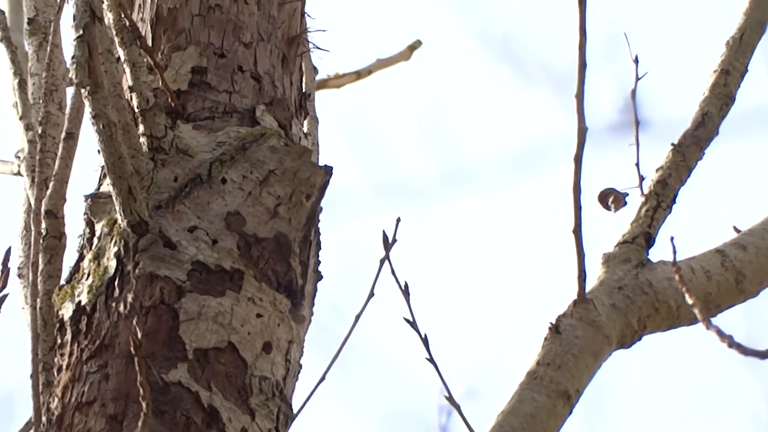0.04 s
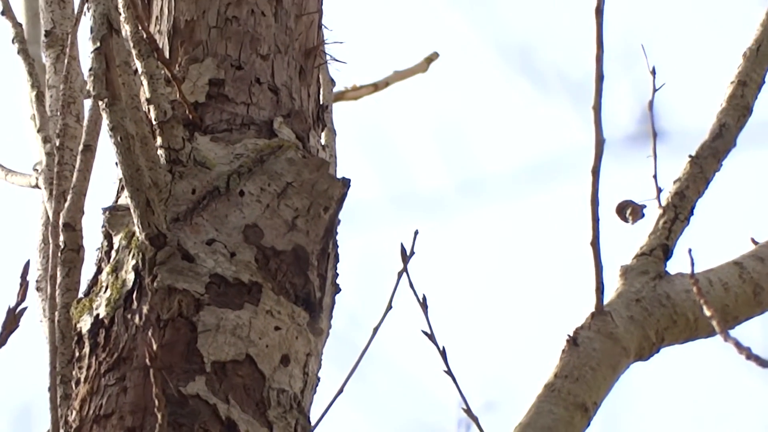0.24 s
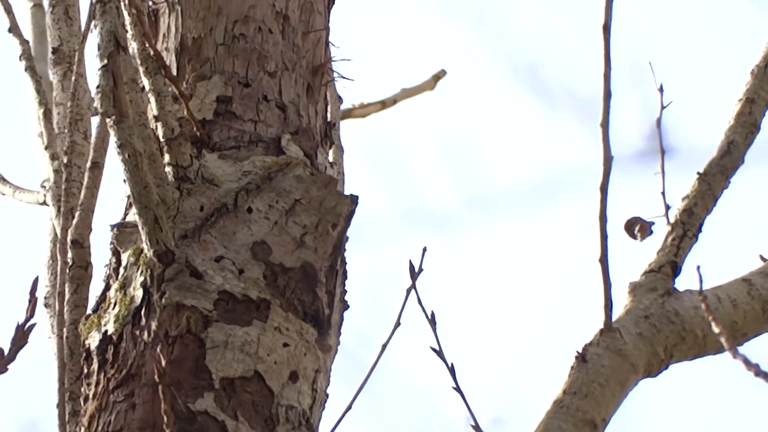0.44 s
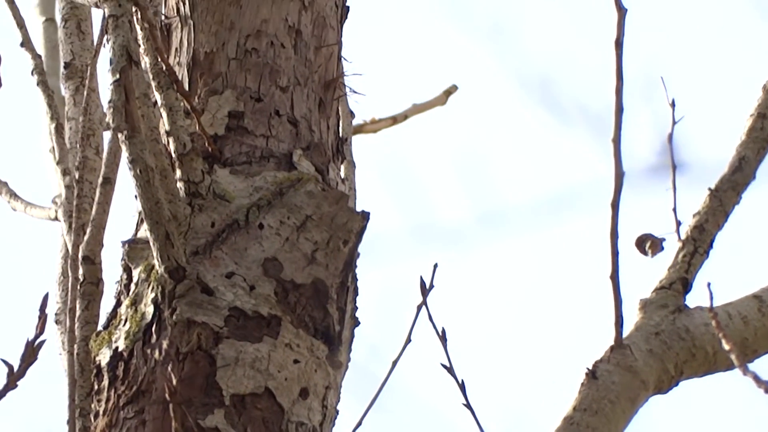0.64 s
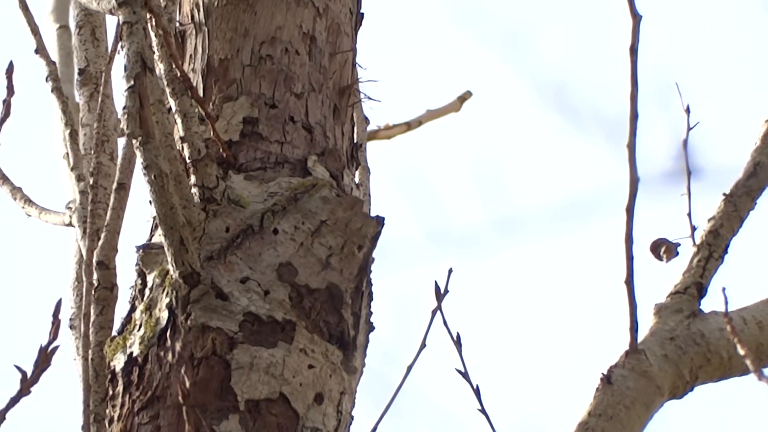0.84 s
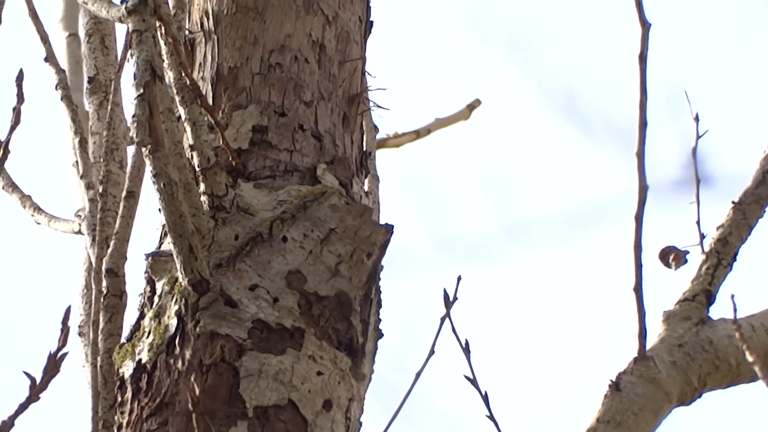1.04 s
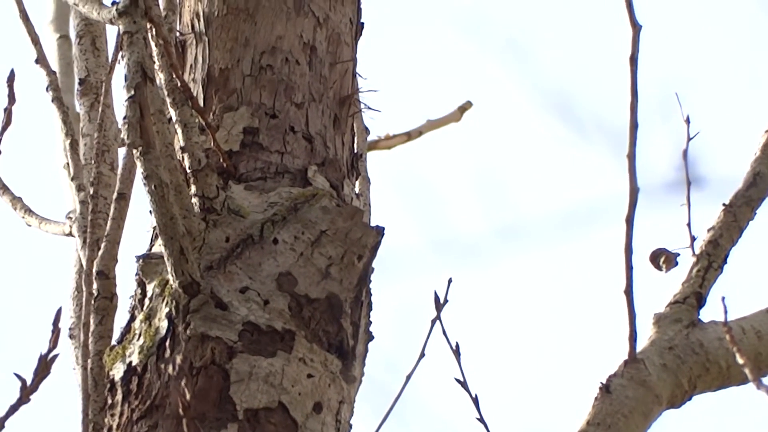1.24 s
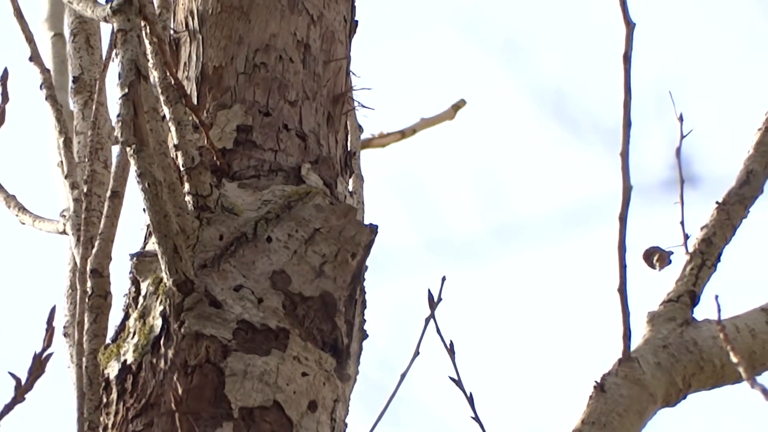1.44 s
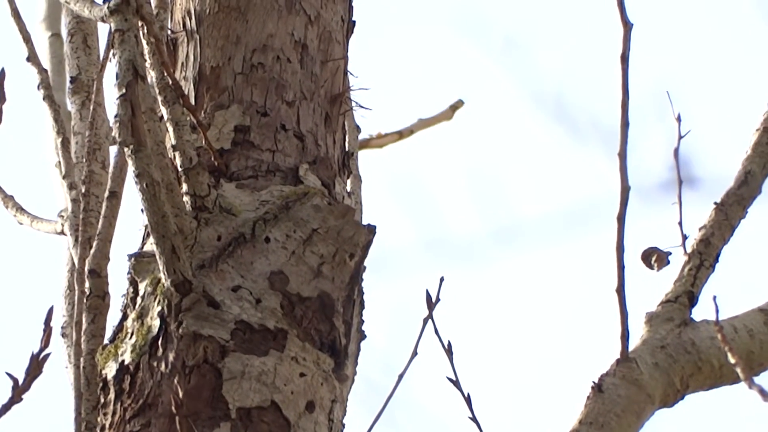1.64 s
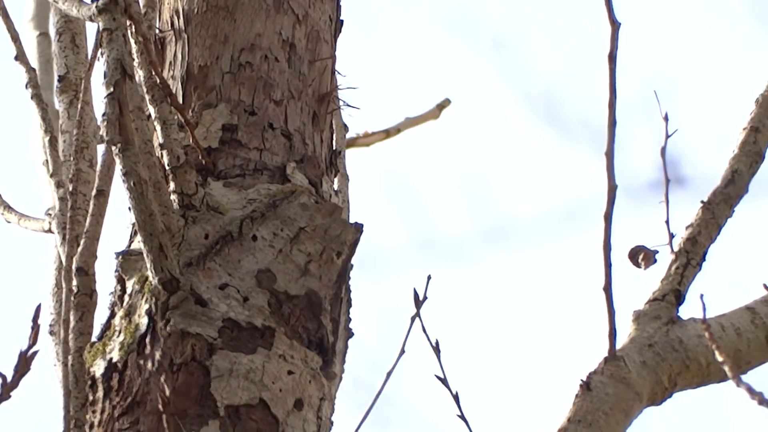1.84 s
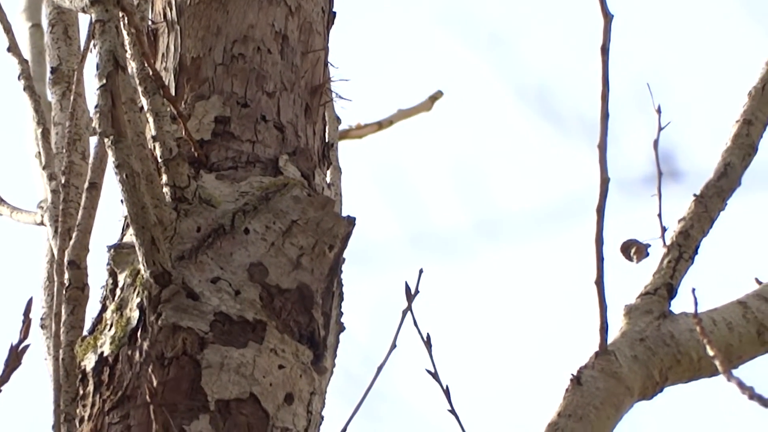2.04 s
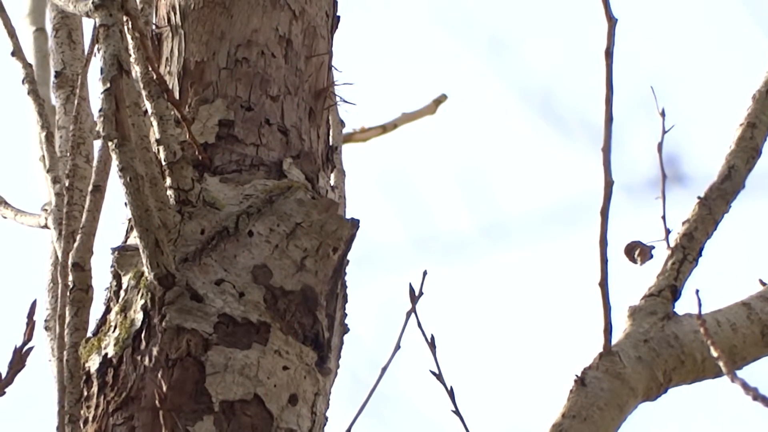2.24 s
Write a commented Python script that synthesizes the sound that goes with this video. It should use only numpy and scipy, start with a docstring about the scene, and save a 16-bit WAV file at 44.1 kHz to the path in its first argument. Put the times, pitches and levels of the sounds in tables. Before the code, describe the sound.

A small bird sings a quick run of thin, high chirps with upward flicks, growing louder past 1 second and echoing lightly among trees. Far off to the left, a woodpecker drums briefly at 0.3 seconds, then from 0.8 to 2. The song stops near 1.9 seconds with a soft lower whistle. A farther bird answers around 2.2 seconds. A faint outdoor hush continues throughout.

```python
"""Over a faint steady outdoor hush, a small bird starts a quick run of thin, high, whistled chirps.
They climb and swell, with sharp upward flicks and soft twitters between; the trees scatter each one.
Far off, probably a woodpecker joins in, each beak blow ringing a trunk's modes.
Near 2 s the song stops, a distant moan swells, a soft lower whistle sounds and the drumming ends.
Last, a farther bird answers."""
import sys
import numpy as np
from scipy import signal
from scipy.fft import rfft, irfft
from scipy.io import wavfile
from scipy.ndimage import uniform_filter1d

SR = 44100
rng = np.random.default_rng(int(sys.argv[2]) if len(sys.argv) > 2 else 0)


def persist_wave(psi):
    """Save psi, clipped to +-1, as 16-bit WAV."""
    counts = np.round(np.clip(psi, -1, 1) * 32767).astype(np.int16)
    wavfile.write(sys.argv[1], SR, np.atleast_2d(counts).T)


N = 101429


def amp(db):
    """dB to gain."""
    return 10 ** (np.asarray(db) / 20)


def unit(x):
    """Scale to rms 1."""
    return x / np.sqrt(np.mean(x ** 2) + 1e-20)


def log_interp(points, hz):
    """Interpolate (f/Hz, value) points on a log-frequency axis."""
    points_hz, values = np.transpose(points)
    return np.interp(np.log(hz + 1), np.log(points_hz + 1), values)


def add(mix, start_s, sound):
    """Mix in at start_s, cropped to fit."""
    at = round(start_s * SR)
    sound = sound[max(-at, 0):]
    part = mix[max(at, 0):][:len(sound)]
    part += sound[:len(part)]


def wander(size, rate_hz):
    """Smooth noise, rms about 1, Gaussian roll-off at rate_hz."""
    span = max(size, 8192)
    hz = np.fft.rfftfreq(span, 1 / SR)
    spectrum = rfft(rng.standard_normal(span)) * np.exp(-(hz / rate_hz) ** 2)
    return unit(irfft(spectrum, span))[:size]


def scatter(x, t60_s, echoes_per_s):
    """Sparse, decaying echoes off trunks and branches; unit-energy response."""
    t = np.arange(SR) / SR
    signs = rng.choice([-1., 1.], SR)
    taps = signs * (rng.random(SR) < echoes_per_s / SR) * amp(-60 * t / t60_s)
    return signal.fftconvolve(x, taps / (np.linalg.norm(taps) + 1e-12))[:N]


def air(spectrum, coherence, patch_db):
    """Steady stereo noise, rms 1, with faint drifting patches; partly common to both sides."""
    hz = np.fft.rfftfreq(1024, 1 / SR)
    re, im, other_re, other_im, patches = rng.standard_normal((N // 256 + 5, len(hz), 5)).T
    patches = uniform_filter1d(patches, size=8, axis=0)  # across frequency
    patches = unit(uniform_filter1d(patches, size=16, axis=1))  # across time
    shared = np.clip(log_interp(coherence, hz), 0, 1)[:, None]
    left = re + 1j * im
    right = shared * left + np.sqrt(1 - shared ** 2) * (other_re + 1j * other_im)
    gain = amp(log_interp(spectrum, hz)[:, None] + patch_db * patches)
    _, noise = signal.istft(np.array([left, right]) * gain, nperseg=1024, noverlap=768)
    return unit(noise[:, :N])


# Hush spectrum: f/Hz, relative density/dB
HUSH_SPECTRUM = [(15, -54.5), (25, -33.5), (132, -23.5), (313, -18), (510, -6.5), (557, -6), (812, -10.5),
                 (948, -7.5), (1080, -11), (1350, -3.5), (1890, -15), (2630, -10.5), (3140, -16),
                 (4680, -18.5), (5000, -16), (6500, -53.5), (11000, -120)]
# Left-right likeness: f/Hz, coherence/0-1
HUSH_COHERENCE = [(60, 0.36), (150, 0.48), (300, 0.59), (550, 0.5), (1000, 0.35), (2000, 0.17),
                  (4200, 0.41)]
# Slow swell: t/s, gain/dB
HUSH_SWELL = [(0, -.5), (.7, 0), (1.3, 2.5), (1.7, 3.5), (2.05, 3), (2.3, -1)]


def hush():
    """Faint outdoor noise, swelling slightly."""
    swell_db = np.interp(np.arange(N) / SR, *np.transpose(HUSH_SWELL))
    return amp(-78.5 + swell_db) * air(HUSH_SPECTRUM, HUSH_COHERENCE, patch_db=1.1)


# Hiss spectrum: f/Hz, relative density/dB
HISS_SPECTRUM = [(2500, -23), (5000, -6), (7000, 5), (9500, -19.5), (12000, -11.5), (15500, -16)]


def hiss():
    """Faint, patchy treble noise, near centre."""
    return amp(-80.5) * air(HISS_SPECTRUM, coherence=[(4000, .99), (10000, .9)], patch_db=3.5)


# Moan contour: t/s, f/Hz, level/dB
MOAN_CONTOUR = [(0, 430, -110), (1.5, 410, -105), (1.622, 430, -85.5), (1.82, 490, -84), (1.92, 540, -73.5),
                (2.051, 550, -84.5), (2.159, 540, -93), (2.28, 540, -79.5)]


def moan(width_hz=45):
    """Distant narrow-band noise; rises and swells late."""
    knots_s, hz, level_db = np.transpose(MOAN_CONTOUR)
    t = np.arange(N) / SR
    phase = 2 * np.pi * np.cumsum(np.interp(t, knots_s, hz)) / SR
    sides = [wander(N, width_hz) * np.cos(phase) + wander(N, width_hz) * np.sin(phase) for _ in range(2)]
    return amp(np.interp(t, knots_s, level_db)) * np.array(sides)


# Trunk modes: f/Hz, relative level/dB, t60/s
TRUNK_MODES = [(1160, -20.5, 0.06), (1379.3, -0.5, 0.063), (1499, -9.5, 0.077), (2080, -14.5, .025),
               (2490, -18, 0.05)]


def blow(rise_s=.0035):
    """One beak blow rings the trunk's modes, each slightly detuned at random."""
    t = np.arange(SR // 8) / SR
    ring = np.zeros(len(t))
    for hz, level_db, t60_s in TRUNK_MODES:
        detuned_hz = hz * (1 + .0025 * rng.standard_normal())
        ring += amp(level_db - 60 * t / t60_s) * np.sin(2 * np.pi * detuned_hz * t)
    return (1 - np.exp(-t / rise_s)) * ring


# Beak blows on wood: t/s, relative level/dB
BEAK_BLOWS = [(.297, -86.5), (0.348, -73), (.398, -73), (.450, -64), (0.502, -68), (0.807, -64.5),
              (0.862, -61.5), (0.909, -64.5), (0.955, -61), (1.004, -59), (1.051, -65), (1.094, -60.5),
              (1.141, -59.5), (1.189, -60.5), (1.234, -63.5), (1.28, -59.5), (1.328, -56.5), (1.374, -60),
              (1.421, -61.5), (1.468, -61), (1.514, -55.5), (1.56, -56), (1.607, -58.5), (1.654, -56.5),
              (1.697, -63.5), (1.746, -57), (1.791, -62), (1.835, -58), (1.882, -57.5), (1.927, -55.5),
              (1.978, -61.5)]


def drumming(left_db=2.5, right_db=-1.5):
    """Two distant rolls, left of centre, blurred by the trees."""
    blows = np.zeros(N)
    for start_s, level_db in BEAK_BLOWS:
        add(blows, start_s, amp(level_db) * blow())
    early = blows + amp(-5.5) * scatter(blows, .15, 1500)
    tails = np.array([scatter(blows, 1.0, 2500), scatter(blows, .35, 3100)])
    return amp([[left_db], [right_db]]) * (early + amp(-3.5) * tails)


def whistle(hz, quaver_hz=75.5):
    """Sine, rms 1, with random pitch quaver."""
    quavering_hz = hz + quaver_hz * wander(len(hz), rate_hz=267)
    return np.sqrt(2) * np.sin(2 * np.pi * np.cumsum(quavering_hz) / SR)


# Soft short notes: t/s, length/s, first f/Hz, last f/Hz, level/dB
TWITTER_NOTES = [(0.142, 0.0086, 6300, 5000, -72), (0.162, 0.083, 4900, 3500, -81.5),
                 (0.204, 0.019, 7960, 7950, -62), (0.283, 0.015, 4710, 6040, -79.5),
                 (0.396, 0.019, 6930, 6540, -58), (0.421, 0.017, 5630, 5060, -85.5),
                 (0.521, 0.018, 7230, 6650, -56.5), (0.53, 0.0084, 5700, 7270, -76),
                 (0.577, 0.0078, 5570, 7580, -70.5), (0.68, 0.013, 5840, 6540, -65.5),
                 (0.75, 0.017, 7940, 8220, -62), (0.859, 0.043, 8340, 8150, -62),
                 (0.882, 0.02, 4690, 5370, -79.5), (0.917, 0.017, 2640, 2950, -77),
                 (0.924, 0.018, 4630, 5320, -79.5), (0.953, .022, 4800, 5260, -82.5),
                 (1.01, 0.019, 4650, 5570, -88), (1.066, 0.019, 5020, 4190, -80.5),
                 (1.19, 0.032, 5750, 5760, -67), (1.198, 0.014, 5200, 4770, -72.5),
                 (1.286, 0.018, 8520, 8300, -61), (1.305, 0.027, 5020, 4240, -80.5),
                 (1.413, 0.011, 4600, 4900, -78), (1.438, 0.052, 8800, 8400, -63),
                 (1.555, 0.022, 3900, 4420, -81.5), (1.571, 0.014, 4720, 4630, -75.5),
                 (1.608, 0.011, 3840, 3820, -72.5), (1.653, 0.018, 5970, 5120, -76.5),
                 (1.682, 0.0098, 4320, 4380, -69.5), (1.701, 0.019, 4020, 3640, -68),
                 (1.728, 0.01, 5260, 6530, -62.5), (1.729, .011, 3720, 3920, -77),
                 (1.767, 0.01, 5900, 4780, -67.5), (1.770, 0.0088, 3570, 4230, -67.5),
                 (1.801, 0.009, 4380, 3310, -75), (1.802, 0.018, 3070, 3200, -70.5),
                 (1.834, 0.0084, 2420, 4460, -68.5), (1.872, 0.021, 4510, 2770, -69.5)]


def twitters():
    """Soft whistles, each a linear glide."""
    out = np.zeros(N)
    for start_s, length_s, first_hz, last_hz, level_db in TWITTER_NOTES:
        u = np.arange(0, length_s, 1 / SR) / length_s
        hz = first_hz + (last_hz - first_hz) * u
        add(out, start_s, amp(level_db) * np.sin(np.pi * u) * whistle(hz))
    return out


# Upward sweeps: t/s, relative level/dB
FLICK_NOTES = [(.164, -52), (.351, -55.5), (0.381, -55.5), (0.461, -55), (0.655, -49), (.680, -56.5),
               (0.699, -60), (0.784, -52.5), (0.835, -49), (1.083, -49), (1.282, -55), (1.365, -48.5),
               (1.710, -51), (1.847, -49)]


def flicks(length_s=.0085, first_hz=5040, last_hz=8100, swell_db=7):
    """Very fast whistled sweeps that swell as they climb into the song's range."""
    u = np.arange(0, length_s, 1 / SR) / length_s
    hz = first_hz + (last_hz - first_hz) * u ** .75
    envelope = amp(swell_db * (u - 1)) * np.sin(np.pi * u) ** 2
    out = np.zeros(N)
    for start_s, level_db in FLICK_NOTES:
        add(out, start_s, amp(level_db) * envelope * whistle(hz))
    return out


def chirps(notes, attack_s=.015, release_s=.009, droop_db=-5, quaver_hz_per_s=900):
    """Whistles that bend to a knee pitch, then fade, mostly sinking; longer notes quaver more."""
    out = np.zeros(N)
    for start_s, length_s, first_hz, knee_hz, last_hz, knee_at, level_db in notes:
        t = np.arange(0, length_s, 1 / SR)
        u = t / length_s
        knee_at = np.clip(knee_at, .05, .95)
        before = np.maximum(1 - u / knee_at, 0)
        after = np.maximum((u - knee_at) / (1 - knee_at), 0)
        hz = knee_hz + (first_hz - knee_hz) * before ** 2 + (last_hz - knee_hz) * after ** 1.7
        attack = np.sin(np.pi / 2 * np.minimum(t / attack_s, 1))
        release = np.sin(np.pi / 2 * np.minimum((length_s - t) / release_s, 1))
        envelope = attack * release * amp(level_db + droop_db * after)
        add(out, start_s, envelope * whistle(hz, quaver_hz_per_s * length_s))
    return out


# Bird notes: t/s, length/s, first f/Hz, knee f/Hz, last f/Hz, knee position/0-1, relative level/dB
NEAR_BIRD = [(-.03, 0.069, 7200, 7150, 6650, 0.29, -61), (0.036, 0.1, 7310, 7352, 7210, 0.07, -55),
             (0.153, 0.055, 7350, 7397, 7350, 0.73, -53), (0.248, 0.041, 7237, 7425, 7550, 0.67, -55),
             (.360, 0.058, 7100, 7616, 7370, .55, -50), (0.467, 0.068, 7296, 7627, 7750, 0.61, -52.5),
             (.582, 0.074, 7416, 7726, 7346, .55, -52), (0.685, 0.073, 7205, 7780, 6860, 0.49, -51.5),
             (0.79, 0.082, 7537, 7925, 7486, 0.55, -51), (0.908, .070, 7440, 7956, 6990, 0.37, -48),
             (1.025, 0.069, 7414, 7990, 6900, 0.46, -47.5), (1.158, .106, 7900, 7955, 7337, 0.02, -44),
             (1.296, 0.097, 7870, 7962, 7365, 0.27, -44), (1.454, 0.099, 7970, 7966, 7180, 0.13, -46),
             (1.598, 0.12, 7955, 8106, 7196, .25, -47.5), (1.749, 0.09, 7817, 7987, 6904, .32, -45.5)]
LOW_NOTE = [(1.918, .11, 3880, 4000, 3930, .4, -73)]
FAR_BIRD = [(2.143, 0.059, 7390, 7400, 7340, 0.62, -66), (2.200, 0.047, 7910, 7720, 7600, 0.26, -65.5),
            (2.223, 0.011, 7100, 7410, 7900, 0.38, -56.5), (2.280, 0.051, 7430, 7650, 7800, 0.48, -68.5)]
# Single echoes off near branches: delay/s
BRANCH_DELAYS_S = [.0038, .0079, .0103, .0137, .0212, .0232]


def birds(trees_t60_s=.49, foliage_t60_s=.24, branches_t60_s=.27, width=.12):
    """All the song, near centre, echoed by trees, foliage and near branches."""
    sweeps = flicks()
    soft = twitters() + amp(-2.5) * chirps(LOW_NOTE)
    song = chirps(NEAR_BIRD) + chirps(FAR_BIRD)
    song += amp(1) * sweeps + scatter(sweeps, foliage_t60_s, 2000)
    mid = song + amp(-2.5) * scatter(song, trees_t60_s, 2500)
    mid += amp(-13) * scatter(song, foliage_t60_s, 2500)
    for delay_s in BRANCH_DELAYS_S:
        add(mid, delay_s, amp(-8.5 - 60 * delay_s / branches_t60_s) * song)
    mid += soft + amp(-4) * scatter(soft, .3, 2000)
    side = width * scatter(song + soft, .087, 1500)
    return np.array([mid + side, mid - side])


def scene():
    """Stereo sum of background, birds and drumming."""
    return hush() + hiss() + birds() + drumming() + moan()


def record(dry):
    """Low-pass at 15.75 kHz."""
    lowpass = signal.firwin(511, 15750, window=("kaiser", 9), fs=SR)
    return signal.oaconvolve(dry, lowpass[None], "same")


dry = scene()
out = record(dry)
persist_wave(out)
```